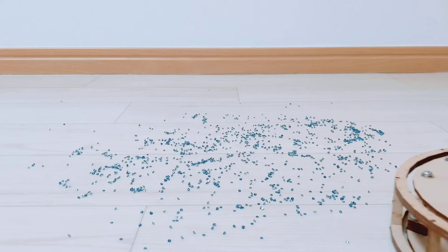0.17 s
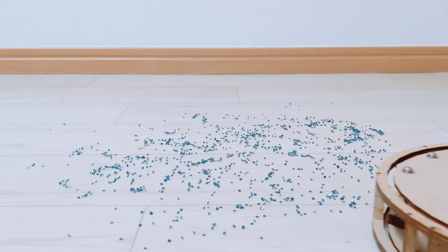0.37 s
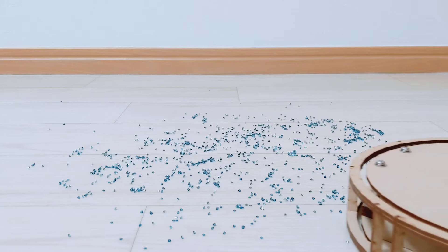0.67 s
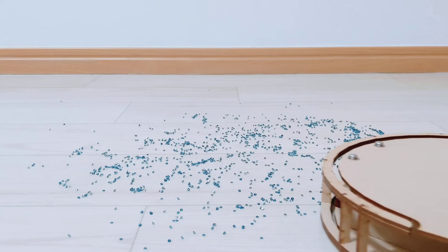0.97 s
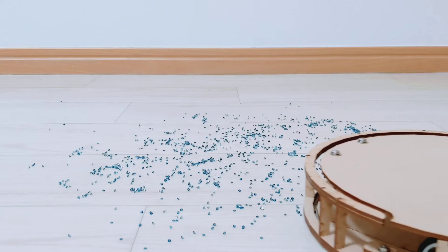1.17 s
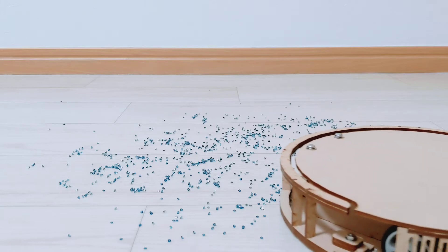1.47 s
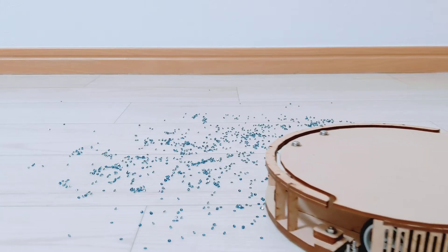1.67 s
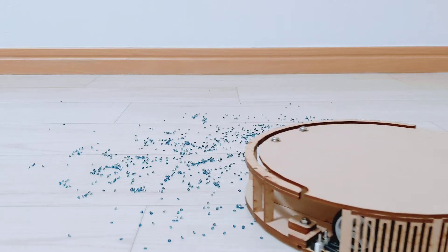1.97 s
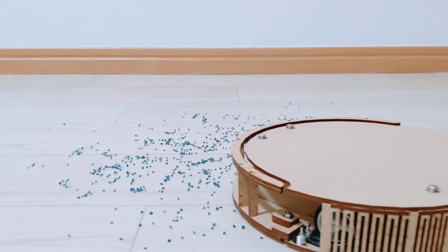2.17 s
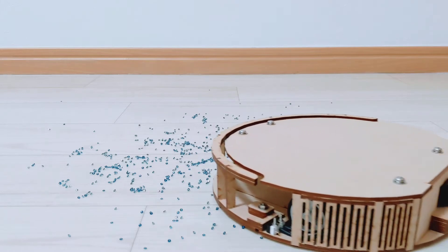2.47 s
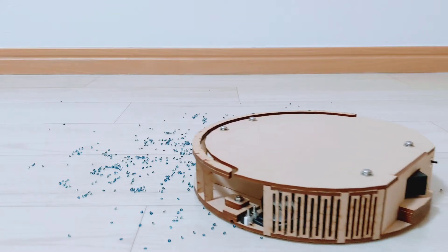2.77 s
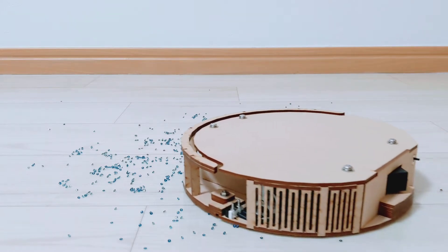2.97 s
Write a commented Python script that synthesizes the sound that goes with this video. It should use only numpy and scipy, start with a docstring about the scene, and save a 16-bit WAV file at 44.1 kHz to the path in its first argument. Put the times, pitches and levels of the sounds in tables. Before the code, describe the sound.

Close up in an indoor room, a little robot vacuum whirs continuously: wavering gear whine, rising fan tone, brush sizzle and airy hiss, with low wheel rumble on the hard floor, running to the end.

```python
"""A small robot vacuum, close by on a hard floor, starts up with a rough note from its gears.
The drive gears whine and sag with the load, and a second motor speeds up to turn the suction fan.
From the start, brushes sizzle in the rush of air and the wheels rumble, with a few swells of drone.
A bright hiss is strongest in the first second, then mostly sinks. Each tone swells and fades to the
end as the robot moves through the room: its direct sound mixes with shifting reflections."""
import sys
import numpy as np
from scipy import signal
from scipy.fft import rfft, irfft
from scipy.io import wavfile

SR = 44100
rng = np.random.default_rng(int(sys.argv[2]) if len(sys.argv) > 2 else 0)


def log_audio(samples):
    """Write samples as a 16-bit WAV file to the path given in sys.argv[1]."""
    # one column per channel
    frames = np.atleast_2d(samples).T
    # limit to full scale, then quantise
    limited = np.clip(frames, -1, 1)
    pcm = np.round(limited * 32767).astype(np.int16)
    wavfile.write(sys.argv[1], SR, pcm)


N = 137151
T = np.arange(N) / SR  # time of each sample in seconds
HZ = np.fft.rfftfreq(N, 1 / SR)  # frequency of each spectrum bin

# drive motor speed (t/s, speed/(turns/s))
DRIVE_SPEED = [(.08, 67), (.105, 74), (.18, 82), (.28, 86), (.5, 88.8), (.68, 88.5), (.8, 90.2), (.95, 92),
               (1.08, 91.9), (1.26, 92.7), (1.35, 89.5), (1.43, 94.1), (1.5, 92.1), (1.7, 91.5),
               (1.8, 91.9), (2.05, 90.4), (2.2, 91.3), (2.33, 92.8), (2.52, 93.7), (2.64, 91.3), (2.77, 94),
               (2.87, 90.9), (3, 96.7), (3.1, 90.5)]
# fan motor speed (t/s, speed/(turns/s))
FAN_SPEED = [(0.08, 216.7), (0.2, 235.8), (0.35, 247.5), (0.6, 254.3), (0.82, 258.7), (0.93, 265.0),
             (1.1, 266.8), (1.2, 270.8), (1.4, 277.0), (1.5, 266.3), (1.68, 263.7), (1.78, 267.3),
             (1.9, 262.2), (2.1, 258.0), (2.25, 261.2), (2.42, 267.5), (2.6, 266.7), (2.72, 274.2),
             (2.95, 278.0), (3.1, 264.2)]
# main gear whine, before the left and right trims (t/s, level/dB)
WHINE_LEVEL = [(.08, -64), (.28, -50), (.37, -52.5), (.53, -45.5), (.6, -48.5), (.68, -43.5), (.75, -54),
               (.9, -49.5), (1.1, -45.5), (1.23, -56.5), (1.3, -49), (1.4, -55.5), (1.53, -45.5),
               (1.7, -46), (1.76, -48), (1.84, -42), (1.9, -51), (1.97, -47), (2.04, -52), (2.26, -44.5),
               (2.35, -50.5), (2.42, -64.5), (2.5, -48), (2.58, -54.5), (2.64, -44), (2.7, -52),
               (2.75, -47), (2.87, -45), (2.97, -65), (3.03, -48.5), (3.1, -50)]
# hum of the second gear, before the trims (t/s, level/dB)
GEAR_HUM_LEVEL = [(.08, -70), (.3, -62.5), (.55, -54.5), (1.05, -63), (1.8, -61), (1.92, -56),
                  (2.17, -51.5), (2.36, -75.5), (2.75, -63), (2.88, -55.5), (2.98, -70), (3.1, -60)]
# strongest side tone of the whine, before the trims (t/s, level/dB)
SIDEBAND_LEVEL = [(.08, -60), (.17, -65), (.3, -52), (.6, -59.5), (.78, -50.5), (.95, -58.5), (2, -56.5),
                  (3.1, -60)]
# high whine of the drive, before the trims (t/s, level/dB)
HIGH_WHINE_LEVEL = [(.08, -80), (.8, -72), (.95, -59), (1.35, -61), (1.58, -54), (1.82, -57), (2, -70),
                    (2.35, -57), (2.7, -60), (3.1, -64)]
# weaker drive tones, before shell and nearness (multiple of shaft rate/1, left level/dB, right level/dB)
DRIVE_ORDERS = [(3.032, -73.5, -75), (6.4, -72.5, -69), (8.91, -69, -66), (11.98, -62, -62),
                (13.42, -62, -65), (16.63, -64, -59.5), (19.76, -95, -62), (27, -63, -68),
                (32.75, -64.5, -66.5), (36, -65.5, -62.5), (39, -72, -64), (60, -66, -80), (84, -75, -83),
                (90, -73, -67)]
# change in tones above UPPER_HZ, which come out as the robot nears (t/s, level/dB)
NEARNESS = [(.08, -20), (.3, 2.5), (.7, -5.5), (1, 1), (1.55, 1), (1.95, 0), (2.15, 3), (2.45, 4.5),
            (2.75, -3), (3, 3)]
# tone of the fan blades, before the trims (t/s, level/dB)
BLADE_LEVEL = [(.08, -73), (.5, -57.5), (.9, -50), (1.3, -47), (1.45, -50.5), (2.1, -50), (2.55, -54),
               (2.9, -51), (3.1, -54)]
# low hum of the fan motor, before the trims (t/s, level/dB)
FAN_HUM_LEVEL = [(.08, -75.5), (.5, -63.5), (.85, -85), (1.45, -71.5), (2.1, -79), (2.45, -68),
                 (3.1, -74.5)]
# thin upper whine of the fan motor, before the trims (t/s, level/dB)
FAN_WHINE_LEVEL = [(.08, -94), (.3, -63), (.7, -60), (1.2, -63), (1.5, -63), (1.7, -59), (1.95, -68),
                   (2.12, -50), (2.3, -62), (2.44, -52.5), (2.6, -58), (3.1, -61)]
# weaker fan tones, before shell and nearness (multiple of shaft rate/1, left level/dB, right level/dB)
FAN_ORDERS = [(4.06, -61.5, -64), (6.93, -71, -74), (11.96, -66.5, -63), (29.5, -63, -64)]
# how the shell colours the air, before mixing (f/Hz, left level per Hz/dB, right level per Hz/dB)
SHELL = [(110, -91.5, -92.5), (165, -92.5, -87), (187, -91.5, -92), (278, -100.5, -87.5),
         (372, -92.5, -89.5), (562, -92.5, -91.5), (595, -83, -94), (710, -89.5, -86.5),
         (908, -76.5, -76.5), (1000, -82, -80.5), (1130, -79, -91.5), (1330, -81, -85), (1670, -76.5, -84),
         (1895, -81, -89), (2250, -95, -88), (2290, -83, -81.5), (2850, -86.5, -84.5), (3300, -85, -84.5),
         (3800, -97, -91.5), (5000, -92, -96.5), (5670, -86.5, -83.5), (6540, -89.5, -96.5),
         (7440, -82.5, -84), (8250, -88.5, -87.5), (9480, -83.5, -87.5), (10920, -94.5, -92.5),
         (13200, -88, -84), (15700, -106, -84.5)]
# how alike the rush is in the two channels (f/Hz, likeness/1)
LIKENESS = [(60, 0.93), (160, 1), (270, 0.26), (450, 0), (740, 0.5), (1220, 1), (2000, 0), (3300, 0),
            (5500, 0.19), (15000, 0.16)]
# centres of the four ranges of the air (f/Hz)
AIR_RANGES_HZ = [1200, 2700, 8000, 13000]
# change in the air, before flicker (t/s, then one level/dB for each of AIR_RANGES_HZ)
AIR_LEVEL = [(.08, -1.8, -3, 0.48, 0), (.2, -2, -1, 1.3, 2.5), (.36, -0.26, -3.5, 1.5, 3),
             (.8, -1.32, 0.5, 0.1, 1), (1.22, 0.73, 0.5, -0.2, 1), (1.32, -0.75, 1.5, 1.2, 4),
             (1.4, 0.72, -0.5, -1.7, -1), (1.5, 0.78, -0.5, 0.15, 1.5), (2.3, 0, 0, -0.43, 0),
             (2.82, 0.022, 0.5, 0.98, -0.5), (2.97, -0.93, -0.5, -1.5, -5), (3.06, 1.5, 0, 0.77, 1.5)]
# narrow, bright hiss (t/s, level/dB)
BRIGHT_LEVEL = [(.08, -62), (.3, -53.5), (.7, -51.5), (1, -64), (1.25, -56), (1.6, -69), (3.1, -61)]
# low rumble of rolling (f/Hz, level per Hz/dB)
RUMBLE = [(5, -95), (14, -71), (25, -83), (36, -79.5), (48, -77), (62, -88), (80, -86), (110, -92),
          (200, -115)]
# brief drones of the wheels (middle t/s, length/s, f/Hz, peak level/dB)
DRONES = [(0.207, 0.14, 48, -59), (0.437, 0.25, 48, -60), (1.1, 0.38, 48, -60), (1.475, 0.34, 83, -59),
          (2.091, 0.98, 81, -64), (3.005, 0.13, 80, -56)]

START_S, RISE_S = 0.072, 0.015
START_WOBBLE, SETTLE_S = 0.03, 0.1  # extra unsteadiness as a share of speed, and how fast it fades
RASP_DB, RASP_HZ, RASP_WIDTH_HZ, RASP_DECAY_S = -56, 703, 38, 0.06
# tones per turn of the drive shaft
PINION_TEETH, SECOND_MESH, SIDEBAND_ORDER, HIGH_ORDER = 10, 20 / 3, 13, 30
# tones per turn of the fan shaft, and a fixed whistle
FAN_BLADES, FAN_WHINE_ORDER, WHISTLE_HZ = 6, 9, 7420
UPPER_HZ = 1900
BRIGHT_HZ, BRIGHT_WIDTH_HZ = 9480, 190
EDGE_HZ = 15780


def amp(db):
    """Turns decibels into a gain."""
    return 10 ** (np.asarray(db) / 20)


def evened(x):
    """Scales a sound to an rms (average strength) of 1."""
    return x / np.sqrt(np.mean(x ** 2) + 1e-20)


def curve(rows):
    """Draws each column of a timed table as a line, sample by sample."""
    s, *columns = np.transpose(rows)
    return np.squeeze([np.interp(T, s, c) for c in columns])


def colour(rows):
    """Draws each column of a spectrum table, bin by bin, on a log frequency scale."""
    f, *columns = np.transpose(rows)
    return np.squeeze([np.interp(np.log(HZ + 1), np.log(f + 1), c) for c in columns])


def drift(rate):
    """Smooth chance movement of rms 1, moving up to about rate times a second."""
    s = np.linspace(0, N / SR, 2048)
    f = np.fft.rfftfreq(len(s), s[1])
    spectrum = rfft(rng.standard_normal(len(s))) / (1 + (f / rate) ** 4)
    return np.interp(T, s, evened(irfft(spectrum)))


def narrow_band(x, centre_hz, width_hz):
    """Keeps a narrow, bell-shaped band of a sound, at rms 1."""
    band = np.exp(-0.5 * ((HZ - centre_hz) / width_hz) ** 2)
    return evened(irfft(rfft(x) * band, N))


def turns(speed, wobble, rate):
    """Shaft angle in radians: speed added up, a little unsteady and more so as the motor gets going."""
    shudder = START_WOBBLE * np.exp(-abs(T - START_S) / SETTLE_S) * drift(70)
    turns_per_s = curve(speed) * (1 + shudder + wobble * drift(rate))
    return 2 * np.pi * np.cumsum(turns_per_s) / SR


def fading(angle, scatter, rate):
    """A tone of about rms 1 whose direct path mixes with shifting reflections."""
    in_step = (np.sqrt(2) + scatter * drift(rate)) * np.cos(angle)
    out_of_step = scatter * drift(rate) * np.sin(angle)
    return (in_step + out_of_step) / np.sqrt(1 + scatter ** 2)


def tone(angle, left_db, right_db, scatter, rate):
    """One tone in two channels, its fading partly shared between them."""
    shared = fading(angle, scatter, rate)
    return np.array([amp(db) * evened(shared + 0.81 * fading(angle, scatter, rate))
                     for db in (left_db, right_db)])


def rasp():
    """Gears taking up the load make a short, rough note: a narrow band of noise that dies away."""
    fade = np.exp(-abs(T - START_S) / RASP_DECAY_S)
    return amp(RASP_DB) * fade * narrow_band(rng.standard_normal(N), RASP_HZ, RASP_WIDTH_HZ)


def drive(angle):
    """Meshing gears: a whine at the tooth rate, its third harmonic, a lower hum and a side tone."""
    whine = amp(curve(WHINE_LEVEL)) * tone(
        PINION_TEETH * angle, left_db=0.5, right_db=-0.1, scatter=0.53, rate=38)
    hum = amp(curve(GEAR_HUM_LEVEL)) * tone(
        SECOND_MESH * angle, left_db=-6.0, right_db=0.5, scatter=0.66, rate=11)
    side = amp(curve(SIDEBAND_LEVEL)) * tone(
        SIDEBAND_ORDER * angle, left_db=-4, right_db=1.5, scatter=0.86, rate=23)
    high = amp(curve(HIGH_WHINE_LEVEL)) * tone(
        HIGH_ORDER * angle, left_db=-2, right_db=1, scatter=0.7, rate=15)
    weaker = overtones(angle, DRIVE_SPEED, DRIVE_ORDERS, scatter=2.15, rate=8.8)
    return whine + hum + side + high + weaker


def overtones(angle, speed, orders, scatter, rate):
    """Weaker multiples of the shaft rate, swelling as they glide across the shell's resonances."""
    f, left_shell, right_shell = np.transpose(SHELL)
    shaft_hz, out = curve(speed), 0
    for k, left, right in orders:
        shell_db = np.interp(k * shaft_hz, f, (left_shell + right_shell) / 2)
        shell_swell = evened(amp(shell_db / 2))  # half the depth of the shell's colour
        near_db = curve(NEARNESS) * (k * shaft_hz.mean() > UPPER_HZ)
        out = out + amp(near_db) * shell_swell * tone(k * angle, left, right, scatter, rate)
    return out


def fan(angle):
    """Blades passing by make a tone; the motor adds hum, whine and a thin whistle of steady pitch."""
    blade = amp(curve(BLADE_LEVEL)) * tone(
        FAN_BLADES * angle, left_db=-3, right_db=-6, scatter=0.84, rate=15.4)
    hum = amp(curve(FAN_HUM_LEVEL)) * tone(angle, left_db=-3.5, right_db=-4, scatter=1, rate=15)
    whine = amp(curve(FAN_WHINE_LEVEL)) * tone(
        FAN_WHINE_ORDER * angle, left_db=-2.5, right_db=-1, scatter=0.61, rate=15)
    whistle = tone(2 * np.pi * WHISTLE_HZ * T, left_db=-62.5, right_db=-65, scatter=1.5, rate=24)
    weaker = overtones(angle, FAN_SPEED, FAN_ORDERS, scatter=1.5, rate=12)
    return blade + hum + whine + whistle + weaker


def brushes(angle, order, rough):
    """One tick per commutator gap, uneven in strength, scattered by the shell and the room."""
    gaps = np.diff(np.floor(order * angle / (2 * np.pi)), prepend=0)
    ticks = gaps * (1 + rough * rng.standard_normal(N))
    # random echoes that fall by 60 dB in 0.16 s
    paths = rng.standard_normal((2, SR // 4)) * amp(-60 * T[:SR // 4] / 0.16)
    return evened(signal.fftconvolve((ticks - ticks.mean())[None], paths, axes=1)[:, :N])


def air(drive_angle, fan_angle):
    """Rushing air (noise) and brush sizzle pass the same resonances of the shell."""
    a, b = rfft(rng.standard_normal((2, N)))
    same = np.clip(colour(LIKENESS), -1, 1)
    rush = np.array([a, same * a + np.sqrt(1 - same ** 2) * b])
    drive_sizzle = amp(-5.5) * brushes(drive_angle, order=3, rough=0.1)
    fan_sizzle = amp(-5.5) * brushes(fan_angle, order=1, rough=0.16)
    treble = HZ ** 4 / (HZ ** 4 + 1900 ** 4)  # keeps the sizzle above about 1900 Hz
    mix = amp(-1.5) * rush + rfft(drive_sizzle + fan_sizzle) * treble
    shelled = mix * amp(colour(SHELL)) * np.sqrt(SR / 2)  # level per Hz to level of white noise
    flutter_db = 0.25 * drift(40)  # shared by all ranges
    out = 0
    for pick, db in zip(np.eye(len(AIR_RANGES_HZ)), curve(AIR_LEVEL)):
        part = irfft(shelled * np.interp(HZ, AIR_RANGES_HZ, pick), N)
        out = out + part * amp(db + flutter_db + 0.92 * drift(25))
    return out


def bright_hiss(angle):
    """Brush ticks ring one narrow, high resonance, which mostly sinks as the robot moves on."""
    ticks = brushes(angle, order=1, rough=0.086)
    return amp(curve(BRIGHT_LEVEL)) * narrow_band(ticks, BRIGHT_HZ, BRIGHT_WIDTH_HZ)


def wheels():
    """Rolling gives a low rumble of shaped noise, with a few swells of droning tone."""
    out = irfft(rfft(rng.standard_normal(N)) * amp(colour(RUMBLE)), N) * np.sqrt(SR / 2)
    for s, length, hz, db in DRONES:
        swell = amp(db) * np.cos(np.pi * np.clip((T - s) / length, -0.5, 0.5)) ** 2
        out = out + swell * fading(2 * np.pi * hz * T, scatter=0.1, rate=14)
    return out


def scene():
    """Adds up both motors, the air, the hiss and the wheels."""
    drive_angle = turns(DRIVE_SPEED, wobble=0.0015, rate=18)
    fan_angle = turns(FAN_SPEED, wobble=0.003, rate=12)
    motors = rasp() + drive(drive_angle) + fan(fan_angle)
    return motors + air(drive_angle, fan_angle) + bright_hiss(fan_angle) + wheels()


def record(dry):
    """The sound opens quickly out of silence; then a filter takes away all above EDGE_HZ."""
    opened = dry * np.clip((T - START_S) / RISE_S, 0, 1)
    low_pass = signal.firwin(1023, EDGE_HZ, window=("kaiser", 9), fs=SR)
    return signal.oaconvolve(opened, low_pass[None], "same")


dry = scene()
out = record(dry)
log_audio(out)
```